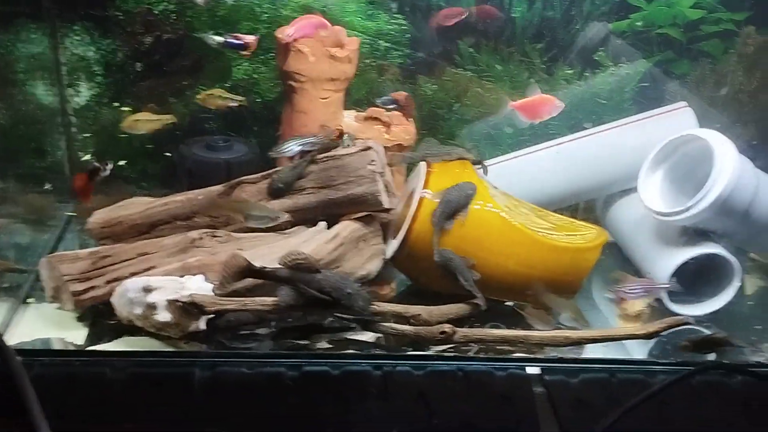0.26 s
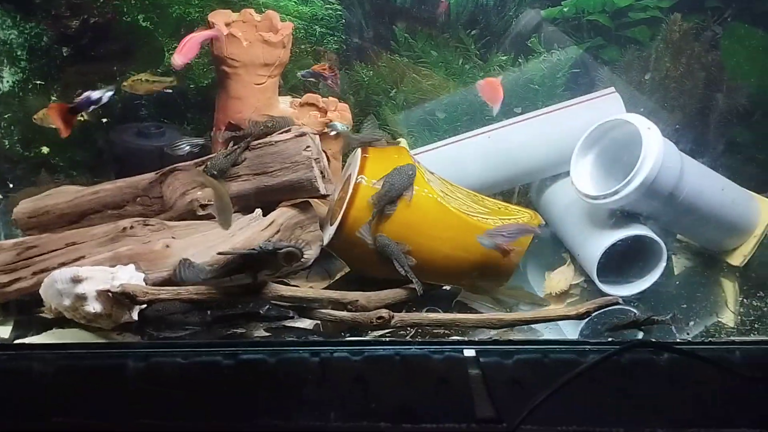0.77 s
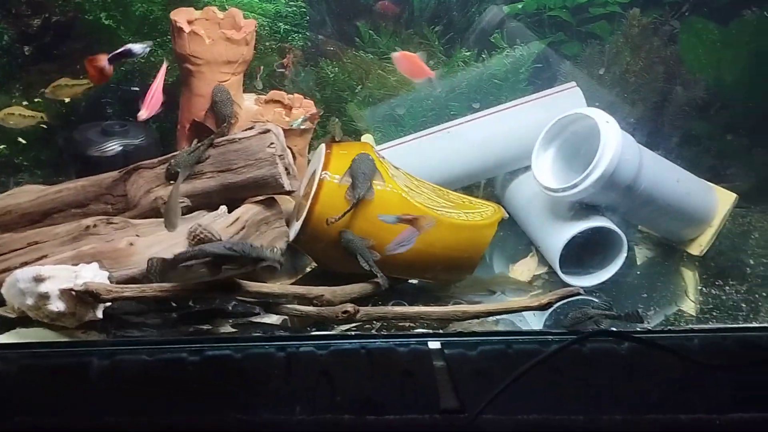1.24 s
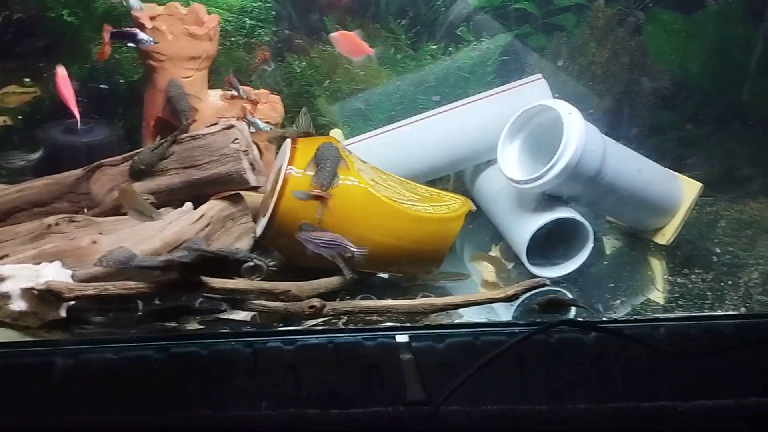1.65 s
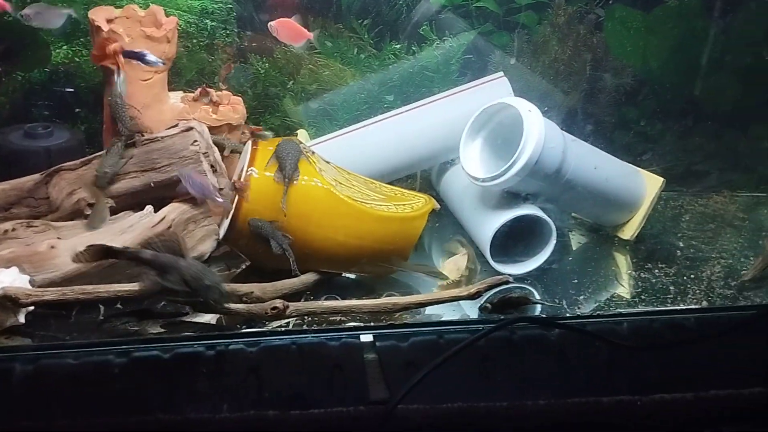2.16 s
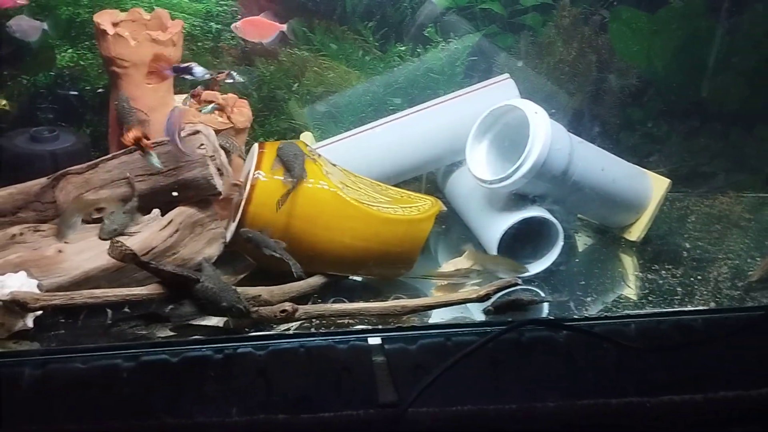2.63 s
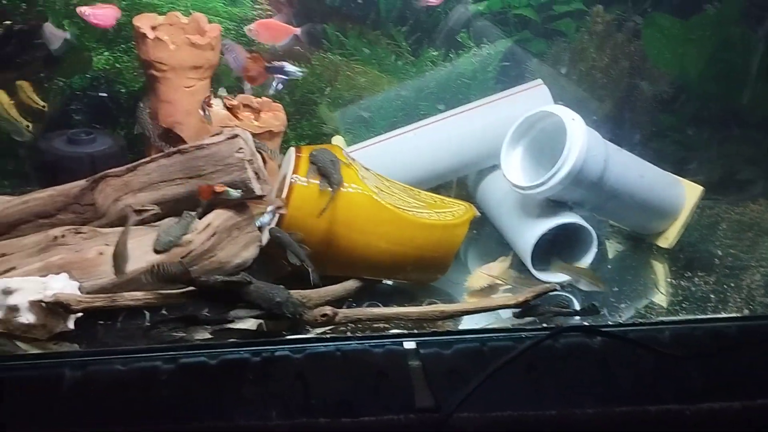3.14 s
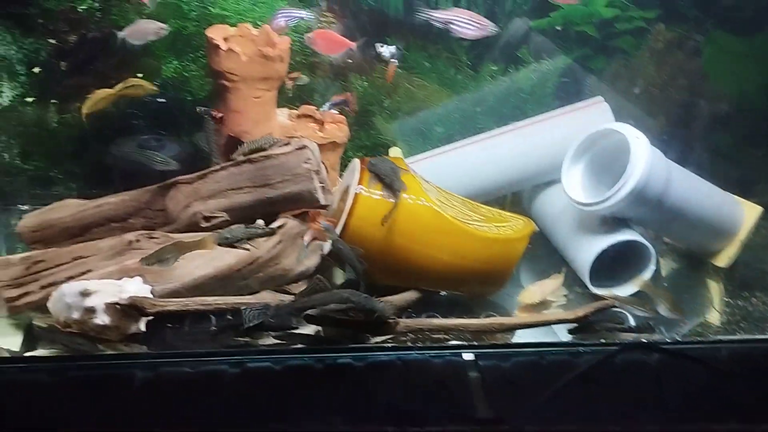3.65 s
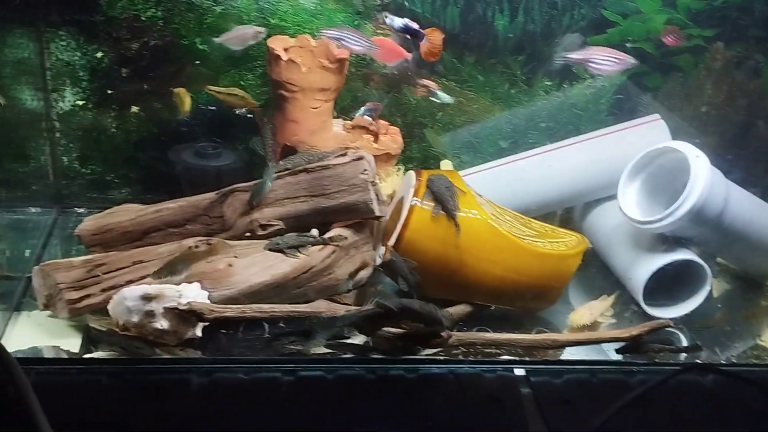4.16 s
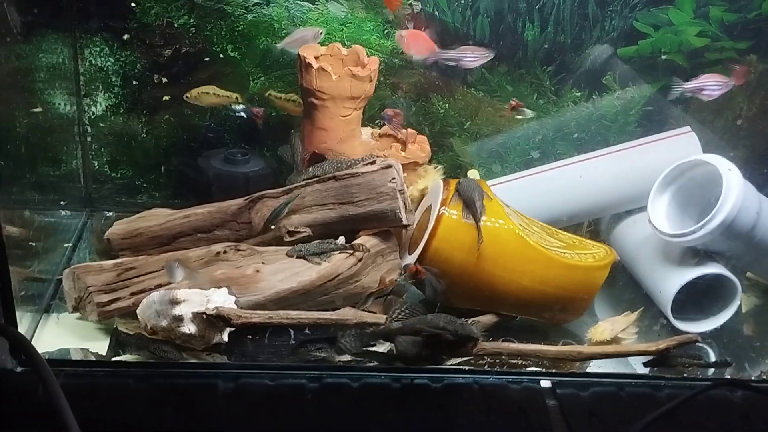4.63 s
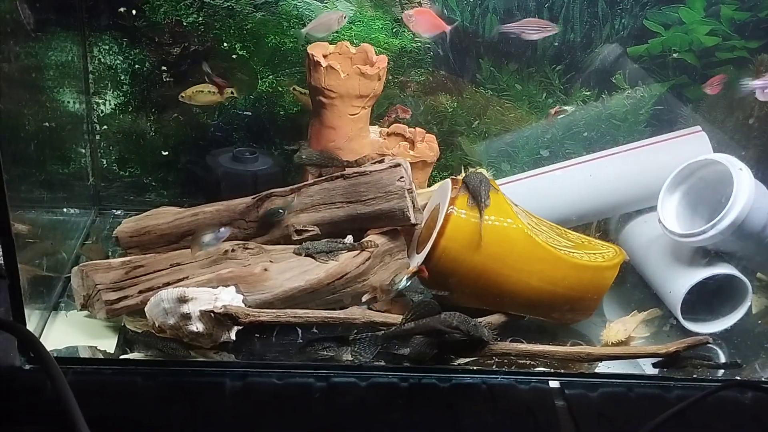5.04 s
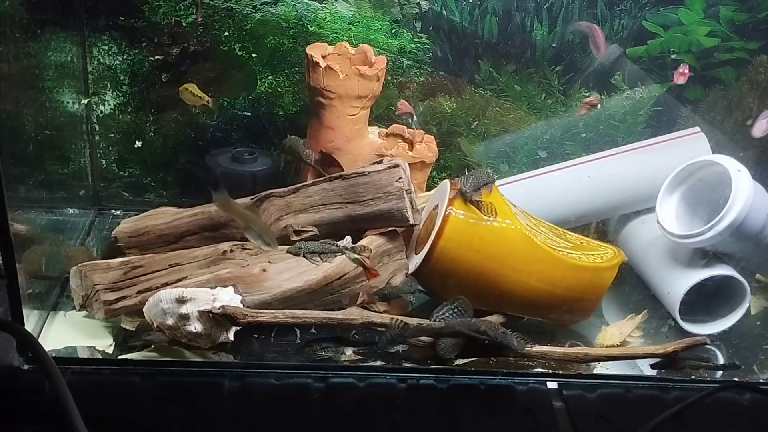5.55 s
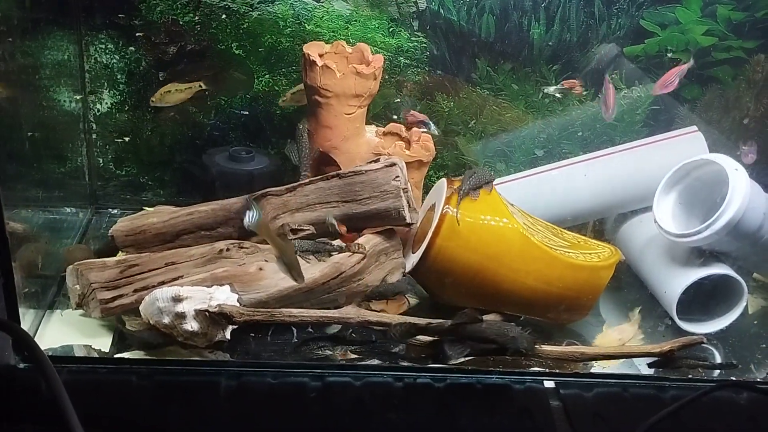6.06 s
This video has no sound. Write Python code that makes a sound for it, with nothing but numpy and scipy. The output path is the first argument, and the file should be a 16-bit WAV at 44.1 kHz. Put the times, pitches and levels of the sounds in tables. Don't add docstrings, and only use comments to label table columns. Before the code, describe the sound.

A small aquarium pump hums low and steadily throughout, its tone throbbing about six times a second beneath a soft wash of room and water noise. Return water trickles continuously, with countless small bubbles and clear, short plinks, mostly mid to high pitched and leaning right, with a short bright room reflection. From 0 to 0.5 s fingers rumble and crackle lightly on the phone's right side, ending in a sharp loud knock at about 0.48 s. The dripping is busiest around 1.5 s, with a prominent plop, eases near 2, thickens again around 2.7, then becomes sparse near 3.2. A short gush comes at about 3.5, followed by thinner, separate drops. Puffs of faint airy spray hiss on the left, clearer near 0.9, 4.35 and 6.0 s. Low grip rumble swells softly around 3.9 and 5.1. At about 6.2 s a dull thump and scrape hit the right side, and everything stops abruptly.

```python
import sys
import numpy as np
from scipy import signal
from scipy.fft import rfft, irfft
from scipy.io import wavfile
from scipy.ndimage import uniform_filter1d

SR = 44100
rng = np.random.default_rng(int(sys.argv[2]) if len(sys.argv) > 2 else 0)


def to_linear_factor(level_db):
    exponent = np.asarray(level_db, float) / 20
    return 10 ** exponent


def generate_wav(signal):
    frames = np.transpose(np.atleast_2d(signal))
    scaled = np.clip(frames, -1, 1) * 32767
    pcm = np.round(scaled).astype(np.int16)
    wavfile.write(sys.argv[1], SR, pcm)


N = 277653
STOP_S = 6.2656


def evened(x):
    return x / np.sqrt(np.mean(x ** 2) + 1e-20)


def read(points, hz):
    f, value = np.transpose(points)
    return np.interp(np.log(hz + 1), np.log(f + 1), value)


def add(mix, start_s, sound):
    part = mix[..., max(round(start_s * SR), 0):][..., :sound.shape[-1]]
    part += sound[..., :part.shape[-1]]


def sides(pan_db):
    return to_linear_factor(np.array([[.5], [-.5]]) * pan_db)


def drift(rate_hz):
    t = np.arange(N) / SR
    knots_s = np.arange(0, N / SR + 1, 1 / rate_hz)
    curve = np.interp(t, knots_s, rng.standard_normal(len(knots_s)))
    return evened(uniform_filter1d(curve, 2000))


def coloured(points):
    spectrum = rfft(rng.standard_normal(N))
    return evened(irfft(spectrum * to_linear_factor(read(points, np.fft.rfftfreq(N, 1 / SR))), N))


# shaft order, mains order, rms level in dB, left minus right in dB.
PUMP_TONES = [(2, 0, -57.5, -1.5), (0, 2, -98.5, 0.5), (3, 0, -58, 1), (1, 2, -48.5, -0.5),
              (0, 3, -95.5, 3), (0, 6, -75.5, 10.5), (0, 8, -78, -2.5), (0, 11, -79.5, -2),
              (0, 13, -81.5, 3.5)]


def pump():
    shaft_hz, mains_hz, in_step_s = 46.774, 49.99, .619
    sway_hz, sway_db = 25.74, -49.5
    t = np.arange(N) / SR - in_step_s
    out = to_linear_factor(sway_db + 0.35 * drift(11.0)) * np.cos(2 * np.pi * sway_hz * t) * sides(-1.2)
    for shaft, mains, db, pan_db in PUMP_TONES:
        tone = np.cos(2 * np.pi * (shaft * shaft_hz + mains * mains_hz) * t)
        wander_db = .7 + 1.5 * (db < -70)
        out = out + to_linear_factor(db + wander_db * drift(3.)) * tone * sides(pan_db)
    return np.sqrt(2) * out


# frequency in Hz, level in dB per Hz.
WASH_SPECTRUM = [(10, -4), (30, -5.5), (75, -9.5), (125, -18), (200, -21.5), (357, -29.5), (642, -32.5),
                 (1530, -46.5), (2990, -50), (5680, -54), (7900, -62), (11000, -62), (13000, -55.5),
                 (16000, -55)]
# frequency in Hz, left-right correlation from -1 to 1.
PORT_LIKENESS = [(60, 1), (150, 0.96), (380, 1), (950, -0.14), (2380, 0.061), (5980, 0.27), (15000, 0.17)]
# frequency in Hz, left minus right in dB.
PORT_BALANCE = [(60, 3), (130, -2.5), (290, 0), (640, -2), (1410, -0.5), (3100, -2), (6820, -2),
                (15000, 7.5)]


def wash():
    frames, hz = N // 256 + 5, np.fft.rfftfreq(1024, 1 / SR)
    a, b, c, d, patches, flicker = rng.standard_normal((frames, 513, 6)).T
    patches = evened(uniform_filter1d(uniform_filter1d(patches, 14, 0), 6, 1))
    flicker = evened(uniform_filter1d(uniform_filter1d(flicker, 200, 0), 3, 1))
    surge_db = 3.0 * patches + 2.3 * flicker
    watery = np.interp(hz, [0, 2500, 6000, 8000, 11000, 13000], [0.027, 1, 1, .4, 0.65, 1.2])[:, None]
    same = np.clip(read(PORT_LIKENESS, hz), -1, 1)[:, None]
    left = a + 1j * b
    right = same * left + np.sqrt(1 - same ** 2) * (c + 1j * d)
    z = np.array([left, right])
    z *= to_linear_factor(read(WASH_SPECTRUM, hz)[:, None] + watery * surge_db)
    z *= to_linear_factor(np.array([.5, -.5])[:, None, None] * read(PORT_BALANCE, hz)[:, None])
    return to_linear_factor(-50) * evened(signal.istft(z, nperseg=1024, noverlap=768)[1][:, :N])


# frequency in Hz, 60 dB decay time in s.
ROOM_DECAY = [(1000, 0.0732), (3000, 0.18), (7000, 0.22), (14000, 0.14)]


def room(x):
    taps = np.zeros((2, SR // 2))
    at = np.arange(120, SR // 2 - 20, 20) + rng.integers(0, 20, (2, (SR // 2 - 121) // 20))
    np.put_along_axis(taps, at, rng.choice([-1., 1.], at.shape), 1)
    hz, t, z = signal.stft(taps, SR, nperseg=256)
    fading = z * to_linear_factor(-60 * t / read(ROOM_DECAY, hz)[:, None])
    tail = signal.istft(fading, SR, nperseg=256)[1]
    return signal.fftconvolve(x, tail / np.linalg.norm(tail[0]), axes=1)[:, :N]


# time in s, rumble level in dB.
GRIP_LEVEL = [(0.0, -44.5), (0.1, -46.5), (0.25, -50.5), (0.49, -44), (0.6, -64), (1.07, -61.5),
              (2.11, -55.5), (2.41, -56), (3.26, -55.5), (3.35, -57), (3.46, -53.5), (3.86, -47.5),
              (4.26, -54.5), (4.38, -60), (4.54, -52.5), (5.15, -49.5), (5.3, -57), (6.1, -52)]
# frequency in Hz, level in dB per Hz.
RUB_SPECTRUM = [(8, 5), (20, 15), (50, -4), (100, -27), (300, -20), (1000, -82), (3000, -122)]
# start in s, size re full scale, pitch in Hz, 60 dB decay in s,
# abruptness from 0 (swing) to 1 (step).
CASE_JOLTS = [(.0935, -.09, 62, .045, 0), (.4745, .07, 420, .03, 0), (.4793, -.25, 570, .02, 0),
              (.4795, .18, 1680, .012, 0), (6.125, .06, 14, .2, 0), (.4796, -.58, 1120, .007, 0),
              (.4801, .25, 760, .005, 0), (.4802, -.2, 150, .02, 0), (.4828, -.06, 900, .01, 0),
              (.4809, -.5, 540, .006, 0), (.4823, .09, 35, .08, .4), (6.163, -.12, 18, .17, 0),
              (6.1918, .27, 50, .13, .36), (6.1918, .11, 15, .15, .8), (6.208, .15, 28, .1, 0),
              (6.2161, .06, 1000, .006, 0), (6.2172, .07, 750, .007, 0), (6.22, -.21, 30, .12, 0),
              (6.23, -.09, 10.5, .3, 0)]
# peak time in s, level in dB, 60 dB rise in s, 60 dB fall in s,
# low-pass corner in Hz.
SKIN_SLIPS = [(.008, -60, .004, .006, 3000), (.048, -62, .003, .004, 7000), (.137, -60, .002, .003, 5500),
              (.147, -58, .006, .008, 1500), (.377, -55, .008, .008, 1200), (.38, -58, .002, .003, 6000),
              (.4135, -54, .002, .004, 2500), (.441, -58, .003, .004, 1500), (4.305, -58, .003, .004, 2000),
              (4.573, -58, .003, .004, 1800), (.482, -29, .014, .010, 6300), (.481, -43, .012, .012, 15700),
              (.482, -29, .016, .011, 2700), (6.193, -39, .002, .016, 4400), (6.195, -38, .004, .016, 1800),
              (6.232, -59, .04, .1, 6300), (6.1925, -60, .001, .004, 15700)]


def hand():
    quiet_db, swing_rise_s, lead_s = -56, .0002, .04
    t = np.arange(N) / SR
    out = coloured(RUB_SPECTRUM) * to_linear_factor(np.interp(t, *np.transpose(GRIP_LEVEL), right=quiet_db) + 7.5)
    u = t[:SR // 2]
    for s, size, hz, t60_s, abrupt in CASE_JOLTS:
        swing = np.sin(2 * np.pi * hz * u + np.pi / 2 * abrupt)
        onset = 1 - (abrupt == 0) * np.exp(-u / swing_rise_s)
        add(out, s, size * swing * to_linear_factor(-60 * u / t60_s) * onset)
    out = signal.sosfilt(signal.butter(20, 4800, fs=SR, output="sos"), out)
    dip = signal.butter(1, (8150, 11950), "bandstop", fs=SR)
    u = t[:8000] - lead_s
    for s, db, rise_s, fall_s, dull_hz in SKIN_SLIPS:
        dull = signal.butter(8, dull_hz, fs=SR, output="sos")
        noise = signal.sosfilt(dull, rng.standard_normal(len(u)))
        noise = signal.lfilter(*dip, noise)
        shape = to_linear_factor(db - 60 * np.maximum(-u / rise_s, u / fall_s) ** 1.6)
        add(out, s - lead_s, evened(noise) * shape)
    return out


# start in s, peak in dB.
SPRAY_PUFFS = [(0.6775, -66), (0.7079, -59), (0.9419, -51), (1.3175, -60), (1.377, -59), (1.4133, -59.5),
               (1.7575, -66), (2.0114, -55), (2.37, -57.5), (2.6714, -56), (2.7365, -57), (2.873, -59.5),
               (3.1379, -61), (3.1858, -55), (3.3928, -60), (3.4487, -60), (3.5, -55), (3.6183, -57),
               (4.0603, -70), (4.3491, -49), (4.5372, -58), (4.7213, -60), (4.9548, -64), (5.062, -59),
               (5.2401, -60), (5.3938, -56), (5.5374, -56), (5.8662, -62), (6.018, -47)]


def spray():
    out, t = np.zeros((2, N)), np.arange(4000) / SR
    for (s, db), u in zip(SPRAY_PUFFS, rng.random(len(SPRAY_PUFFS))):
        band = signal.butter(5, [8000 + 3000 * u, 14800], "bandpass", fs=SR, output="sos")
        hiss = evened(signal.sosfilt(band, rng.standard_normal((2, 4000))))
        add(out, s, hiss * to_linear_factor(db - 23.5 - 60 * t / 0.16) * sides(17.0))
    return out


# start in s, length in s, level in dB.
GUSHES = [(0.134, 0.051, -78), (0.635, 0.1, -74), (0.81, 0.053, -81), (1.619, 0.13, -69.5),
          (1.754, 0.037, -86), (1.885, 0.073, -67.5), (2.3, 0.058, -75), (2.647, 0.059, -68),
          (2.734, 0.025, -71), (3.53, 0.14, -80), (4.32, 0.036, -98), (4.479, 0.04, -76),
          (5.051, 0.033, -73), (5.211, 0.082, -71), (5.366, 0.082, -74), (5.632, 0.032, -67)]


def splashes():
    rise_s, lumpiness_db, pan_db = 0.0084, 2.5, -2
    out, t = np.zeros((2, N)), np.arange(SR // 4) / SR
    band = signal.butter(2, [1920, 5300], "bandpass", fs=SR, output="sos")
    for s, length_s, db in GUSHES:
        noise, lumps = rng.standard_normal((2, 2, len(t)))
        lumps_db = lumpiness_db * evened(uniform_filter1d(lumps[0], size=300))
        shape = np.minimum(t / rise_s, 1) * to_linear_factor(db + lumps_db - 10 * (t / length_s) ** 2)
        add(out, s, evened(signal.sosfilt(band, noise)) * shape * sides(pan_db))
    return out


def bubble(hz, cycles, glide):
    turns = hz * np.arange(1500) / SR
    ring = np.sin(2 * np.pi * turns * (1 + glide * turns / cycles))
    return ring * np.exp(-turns / cycles) * (1 - np.exp(-turns / 2.5))


# time in s, level in dB about the mean.
FLOW_LEVEL = [
    (0.0, 2.5),
    (1.5, 4),
    (1.9, 1.5),
    (2.7, 3.5),
    (3.2, -7),
    (3.56, 3),
    (3.75, -2.5),
    (4.97, -4.5),
    (6.2, 1),
]


def trickle():
    busy = to_linear_factor(np.interp(np.arange(N) / SR, *np.transpose(FLOW_LEVEL)))
    out, clump = np.zeros((2, N)), to_linear_factor(4.3 * np.clip(drift(25.), -2, 2))
    born = rng.random(N) < 500 * clump / SR
    pick = rng.integers(0, 48, N)
    size = to_linear_factor(4.0 * np.minimum(rng.exponential(1, N), 2.5)) * born
    for k, hz in enumerate(np.geomspace(1700, 9000, 48)):
        grain = to_linear_factor(read(WASH_SPECTRUM, hz)) * np.sqrt(hz) * bubble(hz, 11.0, 0.024)
        grains = signal.oaconvolve(size * busy * (pick == k), grain)[:N]
        out += grains * sides(8.0 * read(PORT_BALANCE, hz) + 5 * rng.standard_normal())
    return to_linear_factor(-81.5) * evened(out)


LESSER_PAN_DB = -3.5
# pitch in Hz, typical peak in dB.
FAVOURED_SIZES = [(1850, -84), (2320, -80), (3020, -79), (3600, -80), (4400, -82), (5500, -81), (6250, -84)]


def lesser():
    drops_per_s, pitch_spread, level_spread_db = 16, 0.019, 5
    u = rng.random((int(drops_per_s * STOP_S), 4))
    picked = (u[:, 1] * len(FAVOURED_SIZES)).astype(int)
    hz, db = np.array(FAVOURED_SIZES)[picked].T
    s = (np.arange(len(u)) + u[:, 0]) / drops_per_s
    hz = hz * (1 + pitch_spread * (2 * u[:, 2] - 1))
    db = db + level_spread_db * (2 * u[:, 3] - 1)
    return [(*row, LESSER_PAN_DB) for row in zip(s, hz, db)]


# start in s, pitch # in Hz, peak in dB, left minus right in dB.
BUBBLES = [(.175, 2150, -63, 0), (.292, 2340, -62.5, 9), (0.653, 2570, -63, -9),
           (.727, 2200, -62.5, -9), (.824, 2660, -63, -3), (.887, 2160, -65, -12),
           (1.162, 2610, -62, -6), (1.397, 2410, -66.5, 0), (1.493, 2490, -54, -2),
           (1.546, 2420, -64, -11), (1.591, 1860, -60.5, -16), (1.626, 2320, -65, -3),
           (2.073, 2350, -56.5, -6), (2.148, 1760, -57.5, -2), (2.309, 1950, -64.5, -10),
           (2.378, 2200, -63, -16), (2.418, 2170, -61.5, -8), (2.649, 2330, -56, 0),
           (2.936, 2200, -63, -4), (3.1, 2270, -63.5, -3), (3.427, 2670, -66, 1),
           (3.799, 2130, -64.5, 3), (4.313, 1990, -59.5, 2), (4.477, 1600, -66, 6),
           (4.743, 1870, -67.5, 7), (5.061, 1870, -66, 1), (5.178, 2220, -61, 2),
           (5.228, 2200, -61, 0), (5.636, 1690, -69, -11), (5.85, 1970, -62, 6),
           (.2, 3580, -63, -3), (.349, 3070, -63, -11), (.514, 3500, -66, -5),
                    (.721, 3120, -63, -10), (.768, 3510, -61.5, -13), (.949, 3560, -64.5, -0.5),
                    (1.08, 3100, -64, -9), (1.443, 3120, -61, -13), (1.691, 2820, -60.5, -17),
                    (1.741, 3900, -66, -7), (1.889, 3600, -64, -7), (1.941, 3500, -63, -4),
                    (2.548, 3820, -77, -19), (2.65, 3410, -60, -14), (2.675, 3550, -67, -12),
                    (2.741, 3290, -60, -17), (3.071, 3390, -57.5, -8), (3.378, 3030, -65.5, -7),
                    (3.53, 3090, -62, -9), (3.564, 3680, -66, -5), (3.68, 3140, -65, -7),
                    (3.914, 3130, -64, -12), (4.14, 2900, -63.5, -7), (4.501, 3160, -66, -3),
                    (4.541, 3440, -55.5, -8), (4.564, 3510, -65.5, -15), (5.06, 3150, -57.5, -6),
                    (5.145, 3450, -61.5, -8), (5.63, 3270, -59.5, -4), (5.734, 2820, -68.5, 1),
           (0.136, 4570, -61, 4), (.512, 5670, -66, -17), (.64, 4320, -66, -9),
                 (.723, 4480, -65, -16), (.81, 5600, -62, -18), (.835, 4260, -68.5, 1),
                 (.951, 5500, -62, -9), (1.245, 4200, -66, -7), (1.342, 5600, -66, -11),
                 (1.462, 4300, -63, -11), (1.625, 6030, -62.5, -14), (1.649, 4600, -77, -5),
                 (1.759, 5280, -59, -9), (1.863, 5470, -65, -8), (1.911, 4660, -67, -11),
                 (1.961, 4630, -68, -11), (1.996, 6300, -67.5, -13), (2.225, 4250, -62, -5),
                 (2.343, 7900, -68, -19), (2.674, 5400, -81, -1), (2.799, 5300, -61, -2),
                 (2.954, 4610, -63, 0), (3.466, 5600, -67, -5), (3.615, 4140, -68, -11),
                 (3.903, 4360, -65, 4), (4.353, 5540, -67, -2), (4.782, 5340, -64.5, -1),
                 (5.256, 6400, -67, 2), (5.443, 5700, -63, 0), (5.646, 5570, -71, -5),
           (0.094, 2420, -79, 6), (0.107, 2450, -71, 0), (0.245, 3120, -69, -10), (0.315, 2350, -70, 10),
              (0.323, 1840, -66, -4), (0.371, 1660, -67, -13), (0.436, 1820, -73, 9),
              (0.604, 2920, -69, -12), (0.67, 2090, -67.5, -17), (0.688, 1940, -64, -4),
              (1.438, 2290, -75, -9), (1.644, 2940, -69, -12), (1.852, 2260, -73, -11),
              (1.884, 2200, -67, -12), (1.939, 2370, -71, -3), (1.949, 2860, -73, -7),
              (2.103, 1930, -67, -9), (2.106, 2970, -68, -5), (2.206, 2260, -66, -8),
              (2.248, 3130, -76, -5), (2.458, 2450, -75, 13), (2.516, 1500, -61, -5),
              (2.694, 3030, -67, -2), (3.539, 2020, -67, 2), (3.637, 2340, -70, 0), (4.046, 1940, -72, 9),
              (4.097, 3000, -68, -4), (4.182, 2290, -70, 10), (4.467, 2300, -71, 8), (4.599, 2420, -71, 2),
              (4.632, 2520, -68, -8), (4.807, 2360, -72, 5), (4.883, 3100, -69, -7), (5.017, 2270, -75, 14),
              (5.04, 2030, -72, -1), (5.081, 2370, -68, 6), (5.12, 2280, -68, 0), (5.177, 2970, -65, -0.5),
              (5.227, 2920, -67, -7), (5.368, 2930, -70, -1), (5.469, 2910, -71, 1), (5.475, 2370, -81, 5),
              (5.73, 2950, -68, -2), (5.922, 2570, -73, 4), (5.995, 1940, -71, 9), (6.008, 2920, -74, -5),
              (6.015, 2440, -76, 3), (6.075, 2540, -76, 0)]
# start in s, pitch in Hz, peak in dB.
LESSER_DROPS = [(.03, 3500, -73), (.083, 3300, -70), (.207, 2010, -71), (1.64, 1130, -67),
                (3.64, 1110, -65.5), (4.31, 1810, -65), (4.64, 1110, -65), (.249, 2520, -71),
                (0.44, 1860, -80), (.687, 3200, -64), (.801, 4400, -61), (1.197, 2160, -66),
                (1.249, 3490, -74), (1.32, 3900, -67), (1.365, 2324, -66), (1.677, 3950, -72),
                (1.903, 2600, -73), (2.074, 3240, -65), (2.211, 3000, -68), (2.31, 3480, -65.5),
                (2.864, 2890, -68), (3.292, 3250, -67), (3.439, 3580, -67), (3.502, 3270, -67),
                (3.561, 1815, -66), (3.575, 2960, -66), (3.787, 3570, -66.5), (3.898, 2280, -67),
                (4.1, 3070, -67), (4.313, 3080, -69), (4.67, 1610, -65.5), (4.848, 3030, -65),
                (5.013, 3530, -69), (5.541, 4110, -67), (5.713, 3730, -65), (4.207, 3400, -66),
                (3.057, 3120, -67), (3.017, 3050, -70), (1.18, 2480, -67), (1.095, 3200, -69),
                (2.897, 2880, -76), (3.187, 2110, -69), (4.252, 2950, -71.5), (4.33, 2030, -69),
                (4.662, 3200, -68), (2.965, 2200, -76), (3.188, 12500, -81), (3.216, 12500, -79),
                (0.04, 6740, -76), (0.114, 4350, -59), (0.242, 6250, -76), (0.344, 5470, -68),
               (0.374, 5600, -67.5), (0.395, 7020, -74), (0.715, 5560, -72), (0.836, 4530, -69),
               (0.837, 7020, -81), (0.875, 5900, -74), (0.916, 5990, -74), (1.065, 5500, -68),
               (1.181, 6500, -67), (1.242, 3450, -76), (1.315, 6130, -76), (1.554, 4610, -72),
               (1.609, 3600, -74), (1.676, 5950, -67), (1.754, 6160, -73), (1.775, 6160, -80),
               (1.85, 6160, -75), (1.905, 5900, -68), (1.969, 6300, -69), (2.184, 6250, -75),
               (2.248, 5450, -75), (2.304, 5640, -78), (2.365, 6250, -70), (2.476, 6250, -73),
               (2.541, 3680, -73), (2.606, 7100, -79), (2.669, 6040, -78), (2.671, 3730, -72),
               (2.67, 5530, -75), (2.679, 4630, -72), (2.737, 3660, -62), (2.773, 3580, -75),
               (2.793, 5990, -75), (3.114, 3320, -65.5), (3.56, 4180, -67), (3.596, 4140, -71),
               (3.708, 7110, -78), (3.715, 5640, -72), (3.909, 3540, -70), (4.307, 3550, -73),
               (4.483, 3600, -64), (4.487, 6250, -73), (4.555, 4350, -71), (4.586, 4610, -73),
               (4.721, 3550, -66.5), (5.056, 3620, -69), (5.137, 4270, -67), (5.14, 7110, -81),
               (5.391, 5600, -69), (5.391, 6200, -74), (5.531, 6160, -73), (5.58, 3780, -67.5),
               (5.642, 5600, -75), (5.642, 6200, -80), (5.911, 6350, -73), (6.075, 5300, -69)]


def drips():
    out, source, t = np.zeros((2, N)), np.zeros((2, N)), np.arange(1500) / SR
    rows = BUBBLES
    rows = rows + [(*row, LESSER_PAN_DB) for row in LESSER_DROPS] + lesser()
    for (s, hz, db, pan_db), (u, v, w) in zip(rows, rng.random((len(rows), 3))):
        ring = bubble(hz * (1 - .04 * v), 5.5 + 7 * u, .03 * v)
        ring += .5 * np.roll(bubble(hz * (.86 + .22 * w), 5., .04), int(500 * v))
        band = signal.butter(1, [.78 * hz, 1.35 * hz], "bandpass", fs=SR)
        splash = evened(signal.lfilter(*band, rng.standard_normal(1500)))
        ring += 0.12 * splash * to_linear_factor(-60 * t / 0.039)
        ring *= to_linear_factor(db + 7.5)
        pan_db = np.clip(pan_db, -16, 16)
        gains = sides(pan_db)
        add(out, s, ring * gains / np.sqrt(np.sum(gains ** 2) / 2))
        add(source, s, ring * sides(0.39 * pan_db))
    return out, source


def scene():
    left_early_samples = 14
    near, source = drips()
    small = trickle()
    reverb = to_linear_factor(-1.0) * room(source + small)
    air = pump() + wash() + spray() + near + small + reverb + splashes()
    return np.array([np.roll(air[0], -left_early_samples), air[1] + hand()])


def low_pass(x):
    return signal.sosfilt(signal.butter(12, 16510, fs=SR, output="sos"), x)


def record(dry):
    edge = signal.firwin(511, 15700, window=("kaiser", 9), fs=SR)
    limited = signal.oaconvolve(dry, edge[None], "same")
    n = np.arange(N)
    mix = limited * np.minimum(n / 200, 1) * (n < STOP_S * SR)
    return low_pass(mix)


dry = scene()
out = record(dry)
generate_wav(out)
```